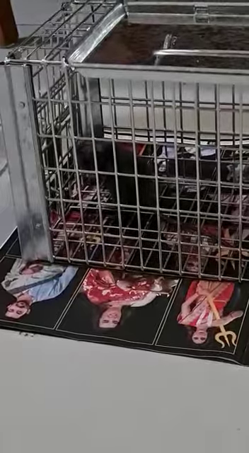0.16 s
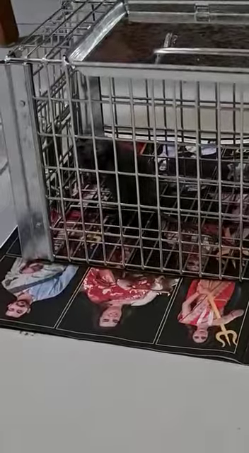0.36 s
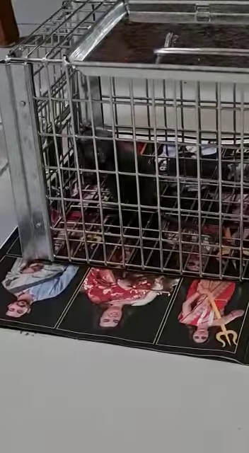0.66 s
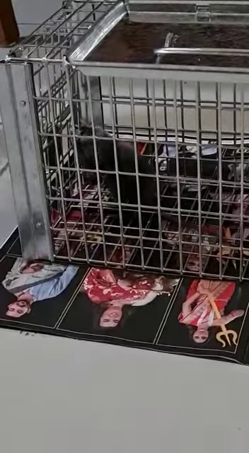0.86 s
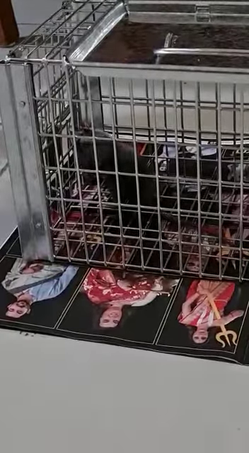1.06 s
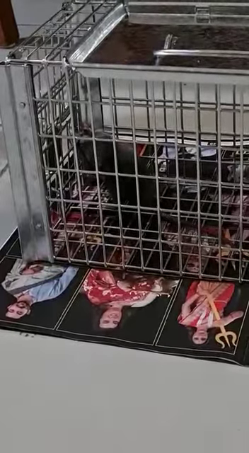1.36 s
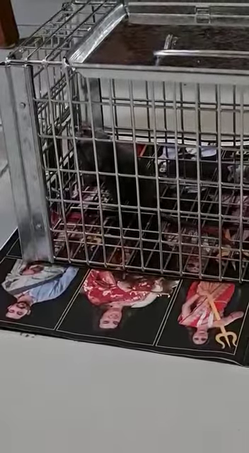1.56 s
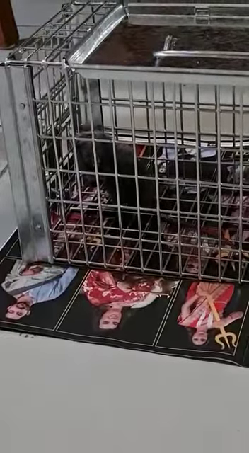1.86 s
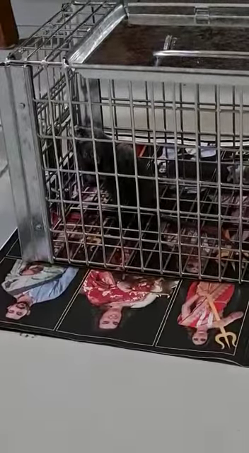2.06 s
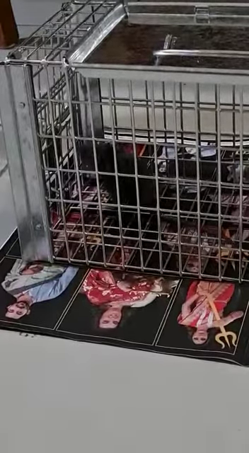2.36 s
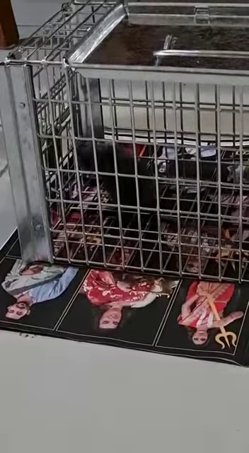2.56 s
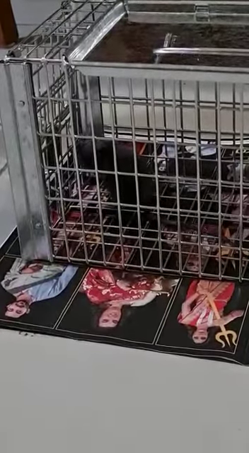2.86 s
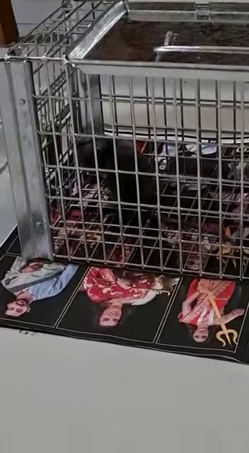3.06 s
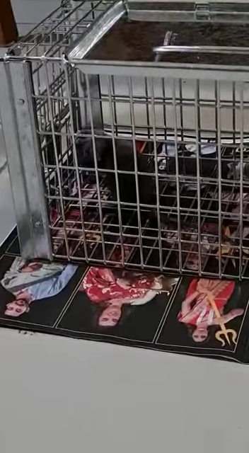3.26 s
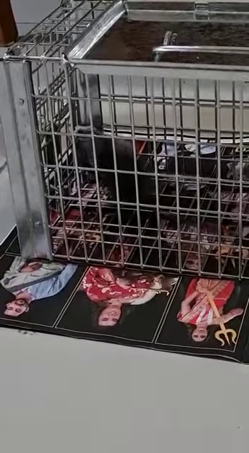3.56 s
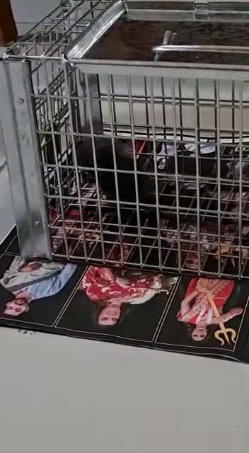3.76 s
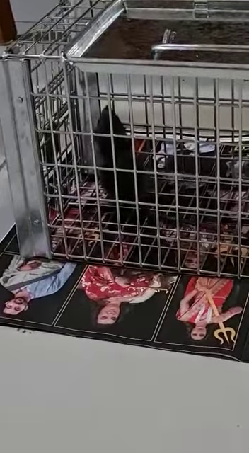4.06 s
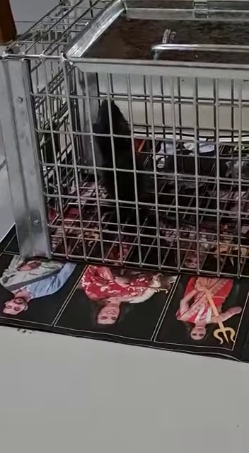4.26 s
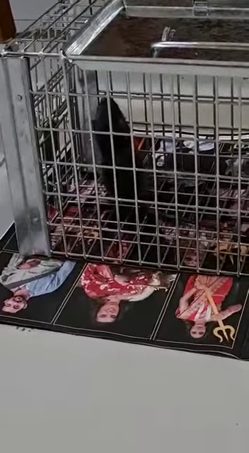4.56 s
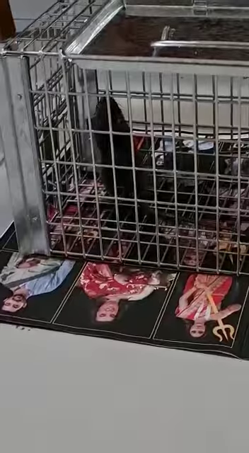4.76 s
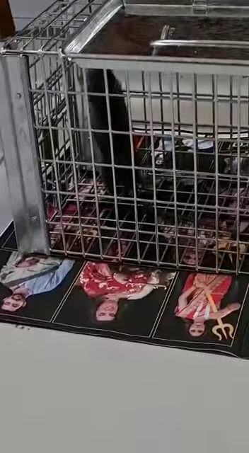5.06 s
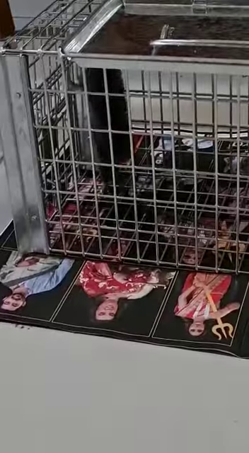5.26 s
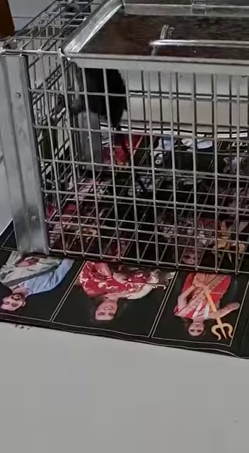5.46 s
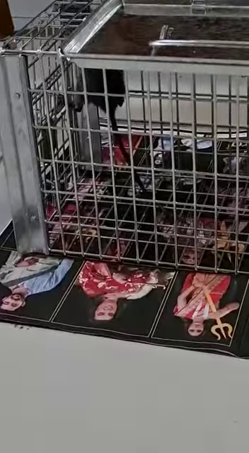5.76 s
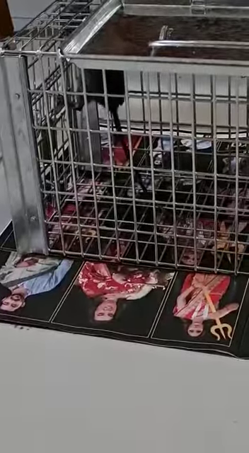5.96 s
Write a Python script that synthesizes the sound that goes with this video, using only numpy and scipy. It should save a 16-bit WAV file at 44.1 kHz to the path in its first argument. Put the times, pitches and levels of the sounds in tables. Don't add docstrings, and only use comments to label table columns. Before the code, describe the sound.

Close stereo microphones pick up faint hiss and low traffic hum, then claws catching and springing off thin steel mesh. The sharp cracks build quickly to one hard clang-like snap, ringing briefly with hard room echoes. Isolated softer rattles come after long gaps; light, regular claw clicks tick on wires near the end, with faint paw rubs, before a final brighter double rattle dies away.

```python
import sys
import numpy as np
from scipy import signal
from scipy.fft import rfft, irfft, next_fast_len
from scipy.io import wavfile
from scipy.ndimage import uniform_filter1d, map_coordinates

SR = 44100
rng = np.random.default_rng(int(sys.argv[2]) if len(sys.argv) > 2 else 0)


def to_wav(s):
    ch = np.atleast_2d(s).T
    pcm = np.round(np.clip(ch, -1, 1) * 32767)
    wavfile.write(sys.argv[1], SR, pcm.astype(np.int16))


def invert_db(level):
    return 10 ** (np.asarray(level, dtype=float) / 20)


N = 270200
LENGTH = 2 * SR // 5

# (frequency [Hz], time to fall 60 dB [s])
MESH_DECAY = [(700, 0.31), (2000, 0.24), (5000, 0.22), (9000, 0.23), (15000, 0.18)]
# (time [s], pitch [Hz], level [dB])
LOW_ENGINE = [(0.0, 38.08, -61.5), (0.17, 35.18, -57.5), (0.78, 28.65, -58), (1.24, 28.5, -61.5),
              (2.029, 41.27, -53), (2.49, 41.13, -59.5), (2.59, 38.67, -57), (3.17, 37.63, -55),
              (3.51, 35.48, -57.5), (3.99, 34.44, -51), (4.52, 30.76, -64.5), (4.87, 35.53, -61.5),
              (5.08, 40.73, -53), (5.23, 35.37, -58), (6.07, 33, -57.5), (6.12, 32.3, -64.5)]



def wall():
    wall_snaps = [
        (1.5013, -18, 0.1457, 0.73, 0),
    ]
    wall_wires = [(1830, 31, -7.5), (3242, 32, -4.5), (3480, 57, -11), (5100, 130, -8.5), (5420, 120, -9),
                  (6650, 130, -3), (6850, 75, -8.5), (7950, 55.5, -12), (8380, 43, -14), (9500, 51.5, -19),
                  (10700, 86, -15), (11900, 160, -14), (13300, 49, -11)]
    wall_mesh = [(290, -55), (500, -24.5), (950, -15), (1300, -12.5), (1900, -4.5), (2650, -10.5),
                 (3200, -7.5), (3900, -14.5), (4700, -6.5), (8500, -8), (14900, -14), (16500, -30)]
    return panel(wall_snaps, wall_wires, wall_mesh, wires_db=-4.5, crack_db=7.0, room_db=-4.5)


def corner():
    corner_snaps = [
        (1.4219, -21.5, 0.01, 0.977, -1.0),
    ]
    corner_wires = [(1860, 38, -14.5), (3297, 26, -0.5), (3458, 34, -5.5), (5300, 52, -4),
                    (6085, 22.6, -22.5), (7000, 35, -6.5), (8840, 40, -4), (10150, 100, -21),
                    (12400, 26.2, -16.5), (13900, 34, -14.5)]
    corner_mesh = [(470, -54.5), (800, -26), (897, -23), (1850, -12.5), (2350, -14.5), (3020, -7),
                   (3700, -6.5), (7150, -9), (11000, -16), (14400, -13), (15700, -26.5), (16500, -55.5)]
    return panel(corner_snaps, corner_wires, corner_mesh, wires_db=1.0, crack_db=2.0, room_db=-7.5)


def post():
    post_snaps = [
        (1.262, -32, 0.011, 0.86, -1.95),
    ]
    post_wires = [(1540, 56, -9), (3500, 26, -4), (4620, 23, -1), (5086, 58, 3.5), (5500, 29, -4),
                  (7190, 46, -5), (7900, 40, -14.5), (12880, 96, -20.5)]
    post_mesh = [(590, -35), (1000, -17.5), (1150, -11.5), (2300, -9), (3390, -5.5), (3940, -13.5),
                 (7090, -7.5), (15200, -31.5), (16500, -42.5)]
    return panel(post_snaps, post_wires, post_mesh, wires_db=1.5, crack_db=-5.0, room_db=-10.0)


def bar():
    bar_snaps = [
        (1.9009, -38.5, 0.0089, 1.22, -0.56),
    ]
    bar_wires = [(3280, 53, -15), (3500, 25.9, -11), (5200, 138, -25.5), (7000, 125, -11), (8460, 93, -13),
                 (10790, 94, -12)]
    bar_mesh = [(900, -37.5), (1600, -24), (2350, -26.5), (2850, -17), (3350, -7.5), (3600, -14.5),
                (3900, -21), (4330, -36.5), (4900, -17.5), (6000, -18.5), (9000, -26), (9800, -29),
                (11000, -25.5), (11700, -40), (14500, -33), (16500, -57.5)]
    return panel(bar_snaps, bar_wires, bar_mesh, wires_db=-0.5, crack_db=0, room_db=-19.0, rise_s=0.0038)


def door():
    door_snaps = [
        (3.6642, -35.5, -0.65, 1.274, -1.013),
        (3.676, -38.5, -1.244, 0.93, -1.27),
    ]
    door_wires = [(1050, 29, 1.5), (1550, 73, 1.5), (1767, 38, -4), (3490, 104, -14.5), (4850, 252, -2),
                  (6890, 107.3, -0.5), (7500, 208, 0), (8100, 230, 3.5), (10660, 157, -1.5)]
    door_mesh = [(450, -34), (800, -16), (2000, -9), (4200, -14), (6300, -11), (7400, -3.5), (8600, -16.5),
                 (10000, -20), (13000, -34), (16500, -47)]
    return panel(door_snaps, door_wires, door_mesh, wires_db=-5.5, crack_db=9.0, room_db=-14.5, rise_s=0.0019)


def roof():
    roof_snaps = [
        (5.7779, -45, -0.99, 2.5, -2.5),
        (5.829, -30.5, 0.194, 0.67, -1),
        (5.839, -34.5, -1.1, 1.347, -2),
    ]
    roof_wires = [(5300, 270, -14.5), (6019, 160, 1), (6790, 167, -3), (7500, 483, -8), (9200, 80, -4.5),
                  (9980, 214, -7), (12700, 190, -18)]
    roof_mesh = [(1100, -22.5), (2400, -21), (3000, -12.5), (4650, -27), (5150, -5), (9400, -5),
                 (10500, -15), (15200, -15.5), (16500, -38)]
    return panel(roof_snaps, roof_wires, roof_mesh, wires_db=3.5, crack_db=-14.0, room_db=-11.5)


def eaves():
    eaves_snaps = [
        (5.5194, -45, 0.011, 1, -2),
        (5.5762, -49.5, -1.1, 1, -2),
    ]
    eaves_wires = [(5740, 200, -3), (7000, 130, -14), (7480, 140, -13.5), (9230, 120, 0.5)]
    eaves_mesh = [(1470, -54), (2500, -21.5), (4800, -18.5), (5500, 3.5), (8980, -2.5), (10500, -17),
                  (15000, -39), (16500, -47)]
    return panel(eaves_snaps, eaves_wires, eaves_mesh, wires_db=8.0, crack_db=1, room_db=-16.5)


def panel(snaps, wires, mesh, wires_db, crack_db, room_db, rise_s=.0006):
    out, t = np.zeros((2, N)), np.arange(LENGTH) / SR
    for s, db, bright, stretch, pan in snaps:
        chatter = invert_db(2.5 * wobble(598, size=LENGTH) * np.exp(-t / .04))
        rise = 1 - np.exp(-t / rise_s)
        shimmer = chatter * rise * dying(MESH_DECAY, stretch, patchy_db=1.5, lines_db=4.0)
        crack = invert_db(crack_db - 60 * t / 0.0044) * rng.standard_normal((2, LENGTH))
        rattle = shimmer + crack
        rattle *= 1 + 0.74 * invert_db(-60 * t / 0.031)
        rattle += 0.065 * filtered(rattle[::-1], lambda f: f < 3000)
        rattle *= 1 - np.exp(-t / 0.00025)

        def tilt(f):
            return invert_db(bright * np.log2((f + 1) / 5000))

        def wire_ring(f):
            return tilt(f) * sum(invert_db(level) * resonance(f, hz, width + 30) for hz, width, level in wires)

        sound = filtered(rattle, lambda f: causal(tilt(f) * invert_db(along(mesh, f))))
        damped = rattle * invert_db(-60 * t / 0.27)
        sound += invert_db(wires_db) * filtered(damped, wire_ring)
        level = invert_db(db - 10.0 + np.array([[pan], [-pan]]) / 2)
        add(out, s, level * sound / np.std(sound[:, :SR // 100]), room_db)
    return out


def frame():
    # (time [s], level of the loudest note [dB])
    jolts = [
        (1.262, -48.5),
        (1.422, -36.5),
        (1.5006, -34.5),
        (1.901, -45),
        (3.666, -48),
        (5.5201, -60.5),
        (5.5765, -68),
        (5.83, -45.5),
        (1.5016, -38.5),
        (5.7775, -57.5),
    ]
    # (frequency [Hz], level [dB], time to fall 60 dB [s])
    post_notes = [(1500, -6, .05), (3117, -5, .12), (3246, -2, .14), (3510, 0, .11), (4440, -2, .05),
                  (4710, -8, .1), (5324, -6, .1), (5825, -12, .2), (6245, -13, .2), (6993, -5, .15),
                  (7235, -3, .13), (7580, -10, .2), (8280, -9, .17)]
    corner_notes = [(1890, -13, .12), (2950, -6, .12), (3112, 0, .12), (3486, -3, .11), (4804, -9, .1),
                    (5055, -8, .12), (5300, -6, .18), (5780, -8, .14), (6414, -8, .12), (6997, -6, .25),
                    (7300, -6, .1), (7569, -14, .12), (9185, -11, .2), (9400, -11, .2)]
    wall_notes = [(1771, -14, .2), (1904, -8, .16), (2476, -19, .3), (2949, -6, .12), (3101, -2, .14),
                  (3135, -3, .07), (3241, -11, .2), (3377, -11, .15), (3490, -10, .15), (5056, -14, .2),
                  (5484, -11, .2), (6415, -16, .3), (6997, -16, .25), (8437, -12, .22)]
    bar_notes = [(2710, -14, .08), (3047, -15, .12), (3102, -10, .14), (3246, -3, .15), (3316, -6, .1),
                 (3472, -5, .1), (3513, 1, .15), (5057, -15, .15), (5157, -12, .2), (5717, -18, .15),
                 (6928, -14, .2), (8543, -18, .18), (11040, -16, .1)]
    door_notes = [(1050, -7, .15), (1561, -4, .08), (1750, -8, .17), (3472, 0, .13), (3876, -10, .1),
                  (4813, -1, .08), (5300, -9, .08), (7176, -12, .25), (7677, -15, .3), (8053, -11, .14),
                  (8280, -15, .28)]
    eaves_notes = [(5819, -3, .2), (6756, -6, .15), (6950, -3, .1), (7768, -4, .2), (9092, 0, .18),
                   (9825, -12, .2)]
    ridge_notes = [(5480, -4, .12), (5620, -3, .15), (5717, -2, .2), (5873, -1, .2), (6050, -5, .1),
                   (6955, -9, .15), (7790, -10, .2), (9098, -5, .15)]
    roof_notes = [(2950, -12, .06), (5136, -8, .13), (5216, -1, .11), (5717, -11, .29), (6395, -9, .19),
                  (6756, -9, .19), (7569, 0, .1), (7660, -10, .3), (8161, -13, .22), (9098, -1, .13),
                  (10050, -17, .24), (10750, -17, .26)]
    tray_notes = [(1184, -11, .15), (1540, -4, .14), (1680, -6, .1), (2019, -5, .13), (2105, -3, .11),
                  (3480, 0, .1), (7020, -4, .12), (7235, -3, .12), (7630, -5, .18), (8441, -2, .16)]
    gable_notes = [(3138, -5, .12), (4694, -8, .15), (6681, -3, .1), (7531, -5, .1), (9103, 0, .09),
                   (9722, -12, .14)]
    # (time [s], frequency [Hz], level [dB], time to fall 60 dB [s])
    latch = (3.672, 6928, -60, .25)
    chords = (post_notes, corner_notes, wall_notes, bar_notes, door_notes,
              eaves_notes, ridge_notes, roof_notes, tray_notes, gable_notes)
    out, t = np.zeros((2, N)), np.arange(LENGTH) / SR

    def note(hz, db, t60):
        waver_db = 3 * np.minimum(t / 0.023, 1) * wobble(60, size=LENGTH)
        swell = 1 - np.exp(-t / .003)
        phase = rng.uniform(0, 0.9, (2, 1)) + rng.uniform(0, 10)
        return invert_db(db - 60 * t / t60 + waver_db) * swell * np.sin(2 * np.pi * hz * t + phase)

    for (s, db), chord in zip(jolts, chords):
        top = max(level for _, level, _ in chord)
        ringing = sum(note(hz, db + level - top, min(t60, .3)) for hz, level, t60 in chord)
        add(out, s, ringing, room_db=-16, echo_db=-41)
    s, hz, db, t60 = latch
    add(out, s, note(hz, db, t60), room_db=-6, echo_db=-40)
    return out


def ticks():
    # (time [s], level in each of the claw's four rings, low to high [dB])
    claw_taps = [(4.5484, -52.5, -71, -59.5, -75), (4.6429, -70.5, -65.5, -66, -72.5),
                 (4.7501, -76, -59, -64.5, -82), (4.8452, -78.5, -62, -61, -82),
                 (4.9554, -43.5, -47, -77.5, -58.5), (5.05, -66, -61, -87, -88.5),
                 (5.1527, -51, -66, -75.5, -78.5), (5.2585, -49, -51.5, -53, -60),
                 (5.3565, -50, -47.5, -51.5, -62.5), (5.5205, -77, -61.5, -47.5, -71),
                 (5.5477, -58.5, -67, -69.5, -76), (5.5993, -80.5, -59.5, -70.5, -86.5)]
    # (frequency [Hz], width [Hz])
    claw_rings = [(3500, 970), (5300, 1740), (8000, 1820), (12200, 5900)]
    pan_db = -5
    out, t = np.zeros((2, N)), np.arange(LENGTH // 2) / SR
    for s, *levels in claw_taps:
        click = (t == 0) + 0.2386 * invert_db(-60 * t / 0.00977) * rng.standard_normal((2, len(t)))

        def colour(f):
            power = sum(invert_db(2 * db) * np.abs(resonance(f, *ring)) ** 4 for ring, db in zip(claw_rings, levels))
            thin_below = 1 + (2700 / (f + 1)) ** 8
            return causal(np.sqrt(power) / thin_below)

        halo = dying(MESH_DECAY, .5, patchy_db=1.5, lines_db=1.5, size=len(t))
        sound = filtered(click + invert_db(-28.5) * halo, colour)
        level = invert_db(21.5 + np.array([[pan_db], [-pan_db]]) / 2)
        add(out, s, level * sound, room_db=-9.5, echo_db=-15)
    return out


def brushes():
    # (time [s], frequency [Hz], width [Hz], length [s], level [dB])
    paw_rubs = [(0.834, 8100, 493.7, 0.053, -91), (1.035, 3171, 250, 0.064, -73.5),
                (1.036, 5200, 402, 0.099, -81), (1.039, 7500, 900, 0.057, -81.5),
                (1.243, 7000, 3000, 0.06, -71.5), (1.41, 4001, 2501, .012, -61.5),
                (3.642, 5940, 3049, 0.06, -74), (5.044, 4792, 1205, 0.02996, -70),
                (5.421, 7690, 699, 0.062, -72), (5.442, 3540, 801, 0.0245, -67.5),
                (5.532, 3325, 894, 0.102, -76.5), (5.781, 3160, 900, 0.03, -61.5),
                (5.838, 2917, 400, 0.019, -64.5), (6.076, 8460, 611.3, 0.04, -73)]
    # (time [s], frequency [Hz], length [s], level [dB])
    wire_grazes = [(0.211, 5300, 0.054, -82.5), (1.092, 3500, 0.033, -81), (1.212, 3187, 0.054, -76.5),
                   (2.286, 7210, 0.052, -95.5), (2.82, 7830, 0.03, -91.5), (3.033, 7900, 0.093, -91.5),
                   (3.062, 5100, 0.086, -85.5), (3.115, 2730, 0.0445, -79.5), (3.665, 4850, 0.0126, -57),
                   (3.672, 1050, 0.029, -69.5), (3.722, 1750, 0.037, -61.5), (3.745, 1050, 0.0264, -60),
                   (4.251, 3165, 0.042, -87.5), (5.089, 7606, 0.034, -85), (5.421, 3180, 0.0155, -69),
                   (5.432, 5284, 0.0357, -69.5), (6.075, 7210, 0.051, -70.5)]
    graze_width_hz = 95
    strokes = paw_rubs + [(s, hz, graze_width_hz, *rest) for s, hz, *rest in wire_grazes]
    rubs, out, t = np.zeros((2, N + SR)), np.zeros((2, N)), np.arange(SR // 10) / SR
    for s, hz, width, length, db in strokes:
        band = filtered(rng.standard_normal((2, len(t))), lambda f: 1 / (1 + ((f - hz) / width) ** 2))
        swell = np.abs(np.sin(np.pi * np.minimum(t / length, 1) ** 0.45))
        rubs[:, round(s * SR):][:, :len(t)] += invert_db(db) * unit(band) * swell
    add(out, 0, rubs[:, :N], room_db=-7.5, echo_db=-41)
    return out


def add(out, s, sound, room_db, echo_db=-9.5):
    # (frequency [Hz], time to fall 60 dB [s])
    room_decay = [(500, 0.13), (2000, 0.46), (6000, 0.485), (10000, 0.35), (15000, 0.36)]
    size = sound.shape[1]
    tail = dying(room_decay, 0.996, patchy_db=2.5, lines_db=2.0, size=min(size, LENGTH))
    tail = np.pad(tail, ((0, 0), (round(.004 * SR), 0)))
    wet = signal.oaconvolve(sound, tail / np.linalg.norm(tail[0]), axes=1)[:, :size]
    echo = np.pad(sound[::-1], ((0, 0), (round(.009 * SR), 0)))[:, :size]
    rest = out[:, round(s * SR):round(s * SR) + size]
    rest += (sound + invert_db(echo_db) * echo + invert_db(room_db) * wet)[:, :rest.shape[1]]


def dying(t60s, stretch, patchy_db, lines_db, size=LENGTH):
    gap_hz = 30
    modes_db = lines_db * rng.standard_normal(SR // 2 // gap_hz + 2)
    mode_hz = np.arange(len(modes_db)) * gap_hz
    noise = filtered(rng.standard_normal((2, size)), lambda f: invert_db(np.interp(f, mode_hz, modes_db)))
    hz, t, z = signal.stft(noise, SR, nperseg=128)
    fall_db = 60 * t / (stretch * along(t60s, hz)[:, None])
    z = z * invert_db(patchy_db * patches(z.shape[1:], 2, 8) - fall_db)
    return signal.istft(z, SR, nperseg=128)[1][:, :size]


def engines():
    # (time [s], pitch [Hz], level [dB])
    high_engine = [(0.0, 40.78, -62.5), (0.97, 42.32, -69.5), (1.18, 47.08, -54), (1.77, 40.3, -67),
                   (2.04, 43.36, -58), (2.84, 45.1, -60.5), (2.98, 48.78, -55.5), (3.65, 55.86, -67.5),
                   (4.02, 45.32, -59.5), (4.21, 51.2, -52.5), (4.6, 47.5, -54), (4.71, 44.37, -63),
                   (4.84, 47.06, -64), (5.13, 45.55, -43), (5.28, 44.75, -72), (5.37, 46.57, -49),
                   (6.07, 47.52, -53.5), (6.12, 47.95, -59)]
    # (time [s], pitch [Hz], length [s], level [dB])
    passing_cars = [(0, 76, 0.445, -60.5), (0.507, 98, 0.372, -59), (1.04, 198.6, 0.485, -64.5),
                    (1.497, 125.1, 0.622, -58), (2.6, 152, 0.67, -67), (3.296, 120.4, 0.562, -61),
                    (4.503, 100.3, 0.61, -65.5), (5.751, 122.4, 0.375, -64.5)]
    t, out = np.arange(N) / SR, np.zeros(N)

    def note(hz, drift):
        return np.sqrt(2) * np.sin(2 * np.pi * np.cumsum(hz * (1 + drift)) / SR)

    for engine in (high_engine, LOW_ENGINE):
        s, hz, db = np.transpose(engine)
        strength = invert_db(np.interp(t, s, db) + 0.55 * wobble(1.7))
        out += strength * note(np.interp(t, s, hz), 0.04115 * wobble(5.1))
    drift, throb = .03 * wobble(9), invert_db(2.4 * wobble(12))
    for s, hz, length, db in passing_cars:
        swell = np.sin(np.pi * np.clip((t - s) / length, 0, 1))
        out += invert_db(db) * throb * swell * note(hz, drift)
    return out * invert_db([[-.9], [.9]])


def street():
    # (frequency [Hz], level [dB per Hz])
    rumble_colour = [(8.8, -38.5), (15, -12), (27, 0), (43, -2), (54, 0.5), (65, -4), (84, -39.5),
                     (140, -120)]
    drone_colour = [(33, -33.5), (56, -3.5), (75, -6.5), (86, -2.5), (102, -5), (150, -12.5), (200, -46),
                    (330, -120)]
    hum_colour = [(88, -28), (150, -6.5), (203, 2.5), (231, -1.5), (307, -4.5), (350, -24.5), (460, -51),
                  (770, -120)]
    wash_colour = [(210, -30.5), (350, -2), (409, -6), (507, -6), (555, -5.5), (623, -4), (758, -2.5),
                   (1250, -7), (1770, -6.5), (2500, -29), (3250, -55), (5500, -120)]
    t = np.arange(N) / SR
    s, _, db = np.transpose(LOW_ENGINE)
    load_db = np.interp(t, s, db - db.mean())
    rumble_db = db.mean() - 5 + 0.87 * load_db + 0.91 * wobble(5.1)
    drone_db = -60.5 + 5.5 * np.exp(-((t - 2.02) / 0.7) ** 2)
    ebb = invert_db(-0.3986 * t)
    low = invert_db(rumble_db) * rush(rumble_colour, patchy_db=-2.0)
    low += invert_db(drone_db) * ebb * rush(drone_colour, patchy_db=1.0)
    high = invert_db(-63) * rush(hum_colour, patchy_db=-0.5)
    high += invert_db(-64.5 + 0.7 * wobble(4.5)) * rush(wash_colour, patchy_db=1.5)
    return low * invert_db([[-.9], [.9]]) + high * ebb * invert_db([[-1.1], [1.1]])


def hiss():
    # (frequency [Hz], level [dB per Hz])
    hiss_colour = [(1290, -39.5), (2200, -3.5), (2430, -4.5), (2690, -6.5), (3220, -9.5), (4210, -15),
                   (5510, -14.5), (6640, -23), (8410, -26.5), (9070, -24), (10400, -23.5), (15200, -19.5),
                   (16500, -30.5)]
    # (frequency [Hz], width [Hz], level [dB])
    whine_tone = (8812, 45, -104)
    hz, width, db = whine_tone
    whine = filtered(rng.standard_normal((2, N)), lambda f: 1 / (1 + ((f - hz) / width) ** 2))
    return invert_db(-84) * rush(hiss_colour, patchy_db=1.0) + invert_db(db + 1.1 * wobble(1.7)) * unit(whine)


def rush(spectrum, patchy_db):
    # (frequency [Hz], likeness [-1 to 1])
    likeness = [(30, 0.6), (60, 0.69), (150, 1), (300, 0.54), (600, 0.72), (1500, 0.071), (3000, 0.12),
                (12000, .05)]
    hz = np.fft.rfftfreq(4096, 1 / SR)
    shape = (len(hz), N // 2048 + 3)
    z = rng.standard_normal((2, *shape)) + 1j * rng.standard_normal((2, *shape))
    turn = np.arccos(np.clip(along(likeness, hz), -1, 1)) / 2
    colour = invert_db(along(spectrum, hz)) * np.array([np.cos(turn), np.sin(turn)])
    z = z * colour[..., None] * invert_db(patchy_db * patches(shape, 6, 4))
    mid, side = signal.istft(z, window="cosine", nperseg=4096)[1][:, 1024:N + 1024]
    return np.array([mid + side, mid - side]) / np.std(mid)


def patches(shape, across, over):
    field = uniform_filter1d(rng.standard_normal(shape), size=across, axis=0)
    return unit(uniform_filter1d(field, size=over, axis=1))


def wobble(rate, size=N):
    steps = np.arange(0, size + 32, 32)
    knots = rng.standard_normal(int(size * rate / SR) + 5)
    return np.interp(np.arange(size), steps, map_coordinates(knots, [steps * rate / SR]))


def unit(x):
    return x / np.sqrt(np.mean(x ** 2) + 1e-20)


def along(points, hz):
    f, v = np.transpose(points)
    return np.interp(np.log(hz + 1), np.log(f + 1), v)


def filtered(x, response):
    m = next_fast_len(x.shape[-1] + 4096)
    return irfft(rfft(x, m) * response(np.fft.rfftfreq(m, 1 / SR)), m)[..., :x.shape[-1]]


def resonance(f, hz, width):
    return 1j * f * width / (hz * hz - f * f + 1j * f * width)


def causal(gain):
    c = irfft(np.log(gain + 1e-6))
    c[1:len(c) // 2] *= 2
    c[len(c) // 2 + 1:] = 0
    return np.exp(rfft(c))


def scene():
    cage = wall() + corner() + post() + bar() + door() + roof() + eaves() + frame()
    return cage + ticks() + brushes() + engines() + street() + hiss()


def top_cut(x):
    return signal.sosfilt(signal.butter(12, 16670, fs=SR, output="sos"), x)


def record(dry):
    # (frequency [Hz], gain [dB])
    treble_end = [(15500, -0.1855), (15900, -17), (16700, -14)]
    stop = np.clip((N - np.arange(N)) / (.002 * SR) - 1, 0, 1)
    mix = filtered(dry, lambda f: invert_db(along(treble_end, f))) * stop
    return top_cut(mix)


dry = scene()
out = record(dry)
to_wav(out)
```